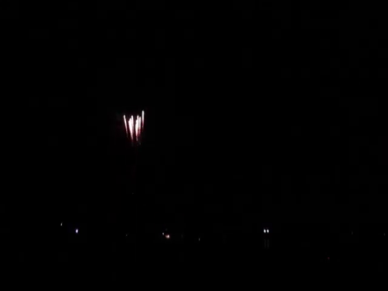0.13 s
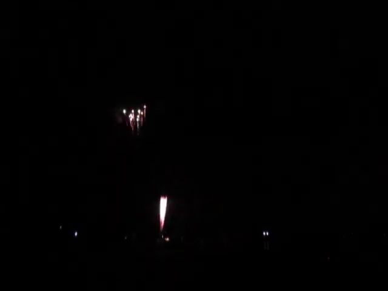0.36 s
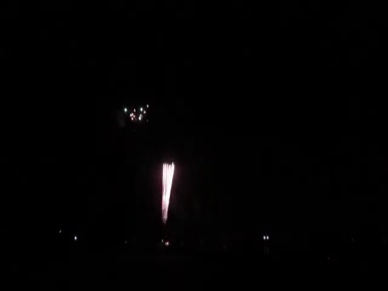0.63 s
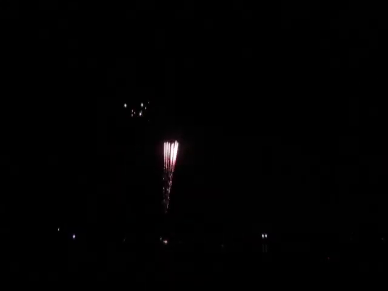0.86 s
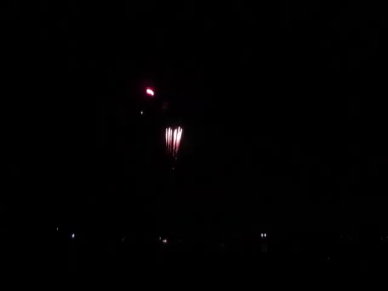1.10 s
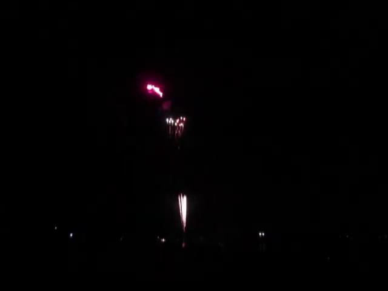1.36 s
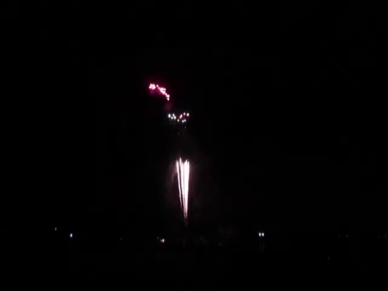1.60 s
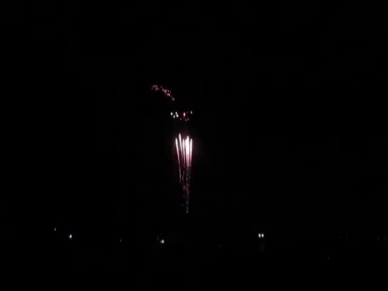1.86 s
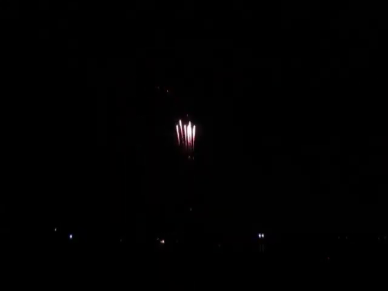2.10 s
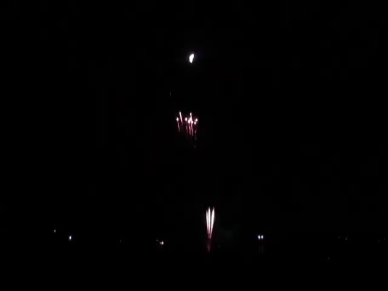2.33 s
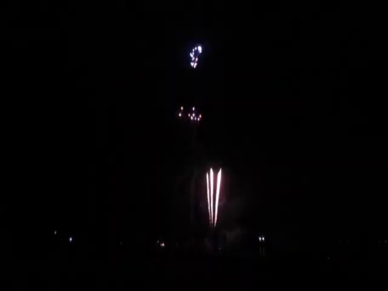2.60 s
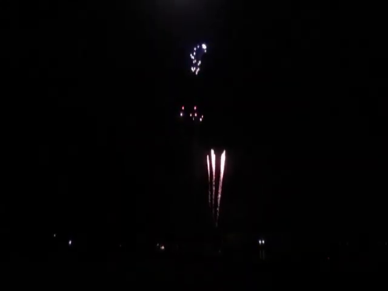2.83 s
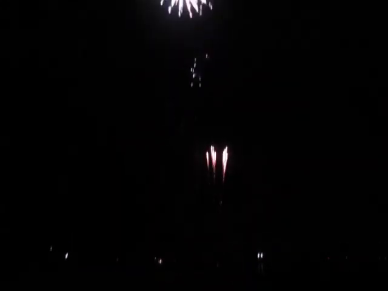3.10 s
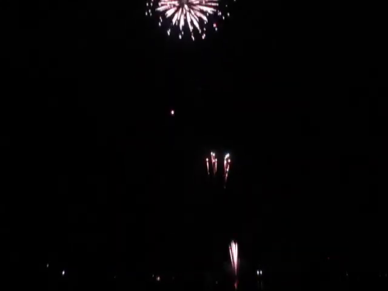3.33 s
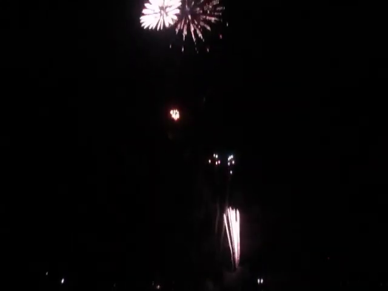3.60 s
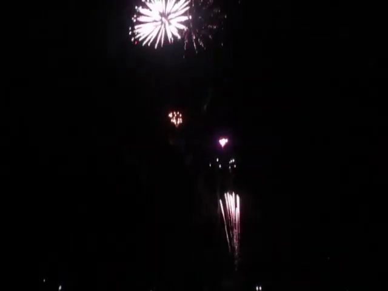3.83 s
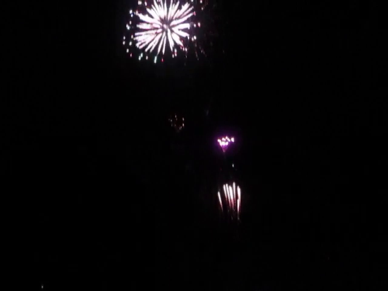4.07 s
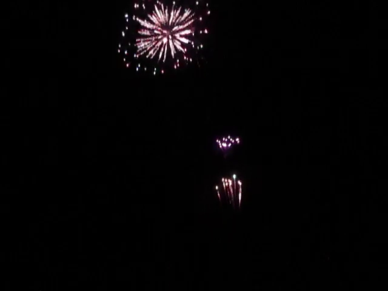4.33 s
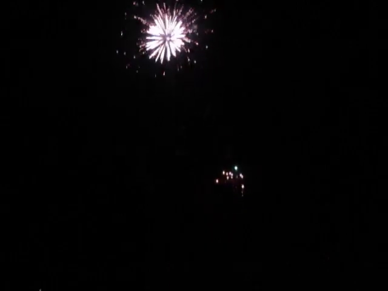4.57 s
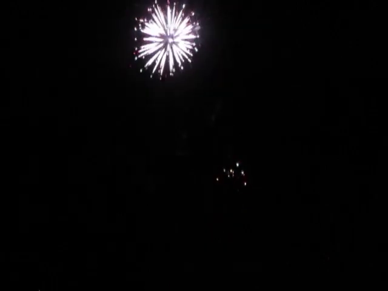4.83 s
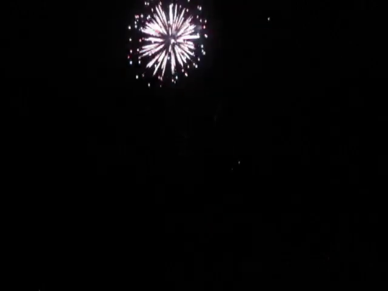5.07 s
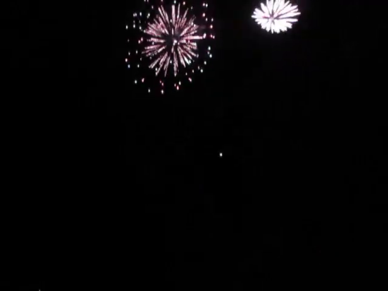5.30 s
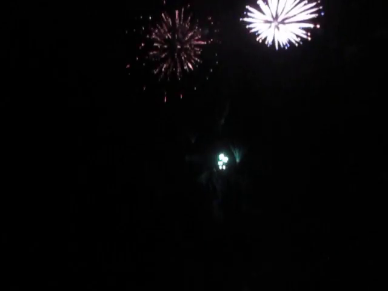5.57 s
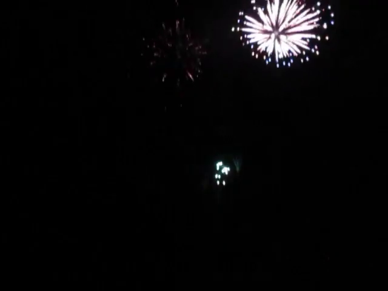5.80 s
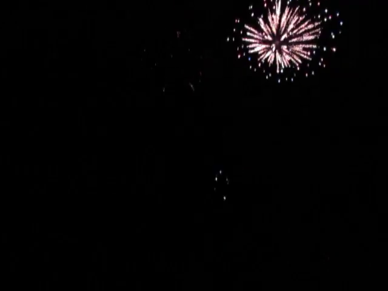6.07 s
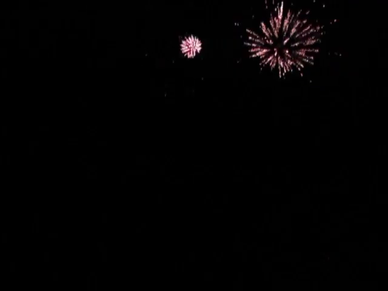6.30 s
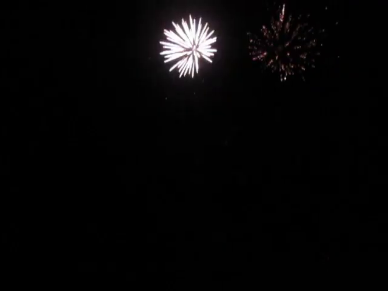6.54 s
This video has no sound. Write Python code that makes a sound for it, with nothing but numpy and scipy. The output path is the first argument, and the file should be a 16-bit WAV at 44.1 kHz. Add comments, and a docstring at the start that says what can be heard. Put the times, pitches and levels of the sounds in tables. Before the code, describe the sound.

Gusty wind thumps a microphone while firework mortars thud, small shells crack, and large aerial shells bang hard with short slapping echoes.

```python
"""Fireworks at night across open ground: gusty wind, a distant roar and a faint bush cricket run from the start.
Four mortar volleys follow about a second apart, each cracks over a decaying sine boom; meanwhile small shells
crack low, and later large shells burst high. Each burst is a filtered shock wave with delayed echoes from the
ground and walls, then a roll of decaying noise. Wind eddies thump; the loudest peaks overload the microphone."""
import sys
import numpy as np
from scipy import signal
from scipy.fft import rfft, irfft
from scipy.io import wavfile
from scipy.ndimage import uniform_filter1d

SR = 44100
rng = np.random.default_rng(int(sys.argv[2]) if len(sys.argv) > 2 else 0)


def volts_from_db(level):
    """Convert decibel levels to linear amplitude ratios."""
    exponent = np.asarray(level, float) / 20
    return 10 ** exponent


def wrap_up_sound(samples):
    """Save the sound to the file named by the first command line argument, as 16-bit audio."""
    columns = np.atleast_2d(samples).T
    # keep every value between -1 and 1, then stretch to whole-number steps
    tamed = np.clip(columns, -1, 1)
    steps = np.round(tamed * 32767).astype(np.int16)
    wavfile.write(sys.argv[1], SR, steps)


N = 294323

# Shell bursts. Each row: start in seconds, front level before the path filter in dB, push in ms,
# then the delays in ms of three echoes that move with the place of the burst.
LARGE_BURSTS = [(3.20278, 6, .70, 8.6, 67.4, 88.5), (4.05028, 6, .66, 8.55, 67.4, 93.4),
                (5.06122, 7, .82, 8.35, 68.0, 91.7), (5.74243, 5.5, .68, 8.85, 66.1, 90.5)]
SMALL_BURSTS = [(1.53495, -2, .33, 16.5, 22.0, 72.3), (2.79328, -22, .30, 16.6, 22.7, 72.0),
                (3.87625, -4.5, .30, 18.4, 22.7, 69.6), (4.21402, -3.5, .29, 16.1, 22.3, 73.1),
                (5.86502, -8.5, .30, 16.4, 22.3, 73.0)]
# Echoes at a fixed delay. Each row: delay in ms, level relative to the shot in dB, low-pass in Hz.
LARGE_FIXED_ECHOES = [(1.6, -15, 3000), (6.0, -7, 2500), (21.0, -18, 2800), (31.5, -23, 700),
                      (248, -30, 1200)]
SMALL_FIXED_ECHOES = [(4.75, -2, 2600), (5.5, -6, 2200), (6.3, -12, 2000), (7.1, -15, 1800),
                      (50.5, -19, 1800)]
# Moving echoes, each with a ground bounce. Each row: echo level relative to the shot in dB, low-pass in Hz,
# bounce delay after the echo in ms, bounce level relative to the shot in dB.
LARGE_MOVING_ECHOES = [(-8.5, 1600, 3.2, -28), (-24, 3600, 2.4, -19), (-24, 1500, 1.2, -26)]
SMALL_MOVING_ECHOES = [(-10, 2300, .8, -19), (-10, 2200, .8, -19), (-23, 4600, 3.5, -25)]
# Mortar volleys. Each row: start in seconds, main crack level in dB, push in ms, low-pass in Hz,
# reference level of the other tubes in dB, boom level in dB.
MORTAR_VOLLEYS = [(.65235, 4, .8, 2200, -10, -6.5), (1.66245, 3, .45, 4500, -8, -8),
                  (2.66662, 3, .75, 2800, -12, -11), (3.67260, -1, .9, 1200, -15, -8)]
# Roll after a shot, a quick spray over a long tail. The row: spray level in dB, spray T60 in seconds,
# tail level in dB, tail T60 in seconds; levels before the roll's common gain.
LARGE_ROLL_DECAY = (-13.5, 0.1163, -40.5, 7)
SMALL_ROLL_DECAY = (-16, 0.0151, -34, 3)
VOLLEY_ROLL_DECAY = (-21.5, 0.3, -36.5, 1.6)
# Roll spectrum. Each row: frequency in Hz, gain in dB.
ROLL_SPECTRUM = [(60, 10.5), (300, -4.5), (1000, -4.5), (3000, -9), (6000, -5), (10000, -20), (16000, -19)]
# Faint puffs, probably echoes of earlier or farther shots. Each row: start in seconds,
# level before the decay in dB, treble tilt in dB per octave.
FAINT_PUFFS = [(0.139, -37, 5), (0.174, -36.5, 7), (0.257, -39.5, 6), (0.2948, -28.5, -2.5),
               (0.366, -35.5, 0), (0.4554, -37.5, 4.5), (0.4863, -33, 4), (0.577, -29.5, 3),
               (0.732, -27, 5), (1.3144, -20, -4.5), (1.719, -26.5, -7), (1.7635, -28, -5.5),
               (2.2614, -41, 4), (2.3877, -30.5, -5.5), (2.4559, -29, -3), (2.559, -35, 3.5),
               (6.282, -50.5, 9.5)]
# Smeared echoes from far slopes and buildings, after every shot of a kind. Each row: delay in seconds,
# level relative to the shot in dB, treble tilt in dB per octave.
LARGE_LATE_ECHOES = [(0.129, -61.5, 6.5), (0.392, -44.5, 8), (.572, -61.5, 11.5)]
VOLLEY_LATE_ECHOES = [(.370, -48, 8.8)]
# Puff spectrum before the tilt. Each row: frequency in Hz, relative level in dB per Hz.
PUFF_SPECTRUM = [(410, -6.5), (800, -9.5), (1480, 6), (2010, -7), (2610, -7), (3750, -17), (14000, -71.5)]
# Leaves return the treble of a large burst. Each row: delay in seconds, level relative to the burst in dB,
# T60 in seconds.
LEAF_RETURNS = [(0, -63, 0.28), (.128, -76, .5)]
# Leaf spectrum. Each row: frequency in Hz, relative level in dB per Hz.
LEAF_SPECTRUM = [(4000, -30), (6500, -2), (8500, 0), (12000, -9), (16000, -22)]
# Gust envelope. Each row: time in seconds, gust level in dB (counted from CALM_DB).
GUST_LEVELS = [(0.0, -40), (0.3, -36), (0.5, -38.5), (0.631, -29), (0.78, -44), (0.87, -27), (0.981, -48),
               (1.171, -22), (1.22, -26), (1.291, -22), (1.4, -41), (1.49, -34), (1.6, -35), (2.15, -46.5),
               (2.56, -34.5), (2.85, -39), (3.5, -42), (3.85, -33), (4.35, -49.5), (4.65, -33.5),
               (4.9, -31.5), (5.15, -28.5), (5.36, -35), (5.45, -25.5), (5.5, -29.5), (5.701, -23),
               (5.84, -39.5), (6.12, -36), (6.3, -51.5), (6.4, -34), (6.48, -47.5), (6.561, -31.5),
               (6.67, -49)]
# Strongest eddies. Each row: centre in seconds, level in dB, frequency in Hz.
WIND_THUMPS = [(0.57, -17, 195), (0.633, -12, 302), (0.642, -9, 485), (0.706, -17, 160), (0.825, -12, 195),
               (0.88, -9, 560), (0.901, -14, 163), (1.145, -15, 345), (1.174, -10, 191), (1.182, -14, 321),
               (1.228, -14, 478), (1.267, -12, 342), (1.278, -12, 298), (1.291, -9, 319), (1.303, -13, 221),
               (1.494, -20, 202), (2.545, -18, 193), (2.554, -17, 253), (2.63, -14, 188), (2.726, -18, 185),
               (3.012, -21, 271), (3.596, -22, 244), (3.832, -21, 195), (4.445, -19, 261),
               (4.949, -13, 395), (4.979, -20, 330), (5.146, -14, 260), (5.172, -19, 352),
               (5.268, -15, 299), (5.311, -19, 564), (5.41, -16, 329), (5.432, -10, 386), (5.458, -15, 197),
               (5.547, -13, 308), (5.618, -18, 199), (5.66, -16, 308), (5.678, -15, 317), (5.724, -14, 435),
               (6.09, -23, 316), (6.128, -22, 228), (6.383, -24, 166), (6.517, -23, 185), (6.545, -20, 200),
               (6.558, -20, 261)]
# Wind rumble spectrum. Each row: frequency in Hz, relative level in dB per Hz.
RUMBLE_SPECTRUM = [(15, 14), (30, -14.5), (60, 10), (110, 4), (200, -36.5), (400, -120.5)]
# Distant roar envelope. Each row: time in seconds, level in dB.
ROAR_LEVELS = [(0.0, -45), (0.61, -39.5), (1.11, -47), (1.6, -40.5), (2.17, -49), (2.62, -43.5), (3.3, -51),
               (3.88, -41.5), (4.59, -45.5), (5.7, -48), (6.1, -52), (6.67, -51.5)]
# Roar spectrum. Each row: frequency in Hz, relative level in dB per Hz.
ROAR_SPECTRUM = [(88, -53), (150, -2), (260, -1), (687, -21), (841, -10.5), (991, -8.5), (1110, -9),
                 (1350, -12), (2670, -21.5), (12000, -62.5), (15600, -100), (22000, -120)]
# Bush cricket trills. Each row: start in seconds, end in seconds, level in dB.
CRICKET_TRILLS = [(-.124, .145, -89), (.805, 1.0, -88), (2.065, 2.455, -87), (2.89, 3.24, -87),
                  (3.762, 4.08, -88)]
# Cricket wing spectrum. Each row: frequency in Hz, relative level in dB per Hz.
WING_SPECTRUM = [(9500, -30), (11200, -5), (12400, -5), (13300, -6), (14000, 0), (15400, -8), (16000, -40)]

BLAST_HIGHPASS_HZ = 62.4  # blasts carry no steady pressure
AIR_LOSS_DB_PER_S_KHZ = 1
GRIT_DB = -21
BOOM_HZ = 62
PUFF_RISE_S, PUFF_T60_S = 0.0041, 0.05
CALM_DB = -40.5  # gust level at which rumble and flutter have their base level
LUMPS_RMS_DB, LUMP_S = 2, .03
RUMBLE_DB, RUMBLE_DB_PER_GUST_DB = -38.5, 0.91
EDDIES_PER_S = 260
FLUTTER_DB, FLUTTER_DB_PER_GUST_DB = -45, 0.94  # per band, at 130 Hz
TILT_DB_PER_OCTAVE, TILT_PER_GUST_DB = -6.5, 0.13  # strong gusts shed smaller eddies
STROKES_PER_S = 25.2
HISS_DB = -93


def evened(x):
    """Scales to rms 1."""
    return x / np.sqrt(np.mean(x ** 2) + 1e-20)


def read(points, hz):
    """Interpolates a spectrum on a log-frequency axis."""
    f, value = np.transpose(points)
    return np.interp(np.log(hz + 1), np.log(f + 1), value)


def add(mix, s, sound):
    """Mixes a sound in at time s."""
    part = mix[max(round(s * SR), 0):][:len(sound)]
    part += sound[:len(part)]


def coloured(x, points):
    """Filters by a spectrum, then scales to rms 1."""
    gain = volts_from_db(read(points, np.fft.rfftfreq(len(x), 1 / SR)))
    return evened(irfft(rfft(x) * gain, len(x)))


def bursts(rows, fixed, moving, decay, suck, top_hz):
    """Shell bursts: direct shock, delayed low-passed echoes with grit, then the roll."""
    out = np.zeros(N)
    for s, db, push_ms, *moving_ms in rows:
        paths = [(0, 0, top_hz), *fixed]
        for ms, (echo_db, hz, bounce_ms, bounce_db) in zip(moving_ms, moving):
            paths += [(ms, echo_db, hz), (ms + bounce_ms, bounce_db, hz)]
        for ms, echo_db, hz in paths:
            gain = volts_from_db(db + echo_db)
            add(out, s + ms / 1000, gain * shock(push_ms, suck, hz))
            if ms > 0:
                add(out, s + ms / 1000, gain * (hz / 2500) ** 2 * grit(push_ms))
        add(out, s, volts_from_db(db) * roll(shock(push_ms, suck, top_hz), decay))
    return out


def shock(push_ms, suck, top_hz):
    """A steep front, a falling push, a suction of depth suck, then rest; the path rounds it off."""
    u = np.arange(400) / SR * 1000 / push_ms
    wave = np.interp(u, [0, 1, 1.5, 2.1, 3.5], [1, 0, -.75 * suck, -suck, 0])
    return signal.lfilter(*signal.bessel(3, min(top_hz, 18000), fs=SR, norm="mag"), wave)


def grit(push_ms, spray_ms=0.82):
    """Rough surfaces scatter the bright part of a front into a short noise spray."""
    t_ms = np.arange(300) / SR * 1000
    spray = rng.standard_normal(len(t_ms)) * np.exp(-t_ms / spray_ms)
    front = signal.lfilter(*signal.butter(2, 2500, "high", fs=SR), shock(push_ms, 0.4, 4160))
    return volts_from_db(GRIT_DB) * np.convolve(front, spray)


def roll(wave, decay):
    """Thousands of small scattered copies of a shot, losing treble as they travel."""
    size = round(1.2 * SR)
    patch_db = 2.44 * rng.exponential(1, size // 20 + 1).repeat(20)[:size]
    taps = evened(rng.standard_normal(size) * volts_from_db(patch_db))
    taps = taps * two_decays(np.arange(size) / SR, *decay)
    hz, t, z = signal.stft(taps, SR, nperseg=256)
    air_db = AIR_LOSS_DB_PER_S_KHZ * t * hz[:, None] / 1000
    z = z * volts_from_db(read(ROLL_SPECTRUM, hz)[:, None] - air_db)
    return 0.19 * signal.fftconvolve(signal.istft(z, SR, nperseg=256)[1], wave)


def two_decays(t, spray_db, spray_t60_s, tail_db, tail_t60_s):
    """Gain of a quick decay that gives way to a slow one."""
    return np.hypot(volts_from_db(spray_db - 60 * t / spray_t60_s), volts_from_db(tail_db - 60 * t / tail_t60_s))


def volleys():
    """Several tubes fire within 16 ms; their gas leaves together as one slow boom."""
    out, t = np.zeros(N), np.arange(round(.08 * SR)) / SR
    swell = (t / .0135 * np.exp(1 - t / .0135)) ** 2
    boom = swell * np.sin(2 * np.pi * BOOM_HZ * t + .45)
    for s, db, push_ms, top_hz, tubes_db, boom_db in MORTAR_VOLLEYS:
        add(out, s, volts_from_db(db) * shock(push_ms, .25, top_hz))
        add(out, s, volts_from_db(db - 7) * (top_hz / 2500) * grit(push_ms))
        add(out, s + .0029, volts_from_db(db - 11) * shock(push_ms, .3, 2200))  # ground bounce
        for at, fade, push in rng.random((30, 3)):
            tube_s = s - .007 + .016 * at
            crack = shock(.1 + .4 * push, .9, 2400)
            add(out, tube_s, volts_from_db(tubes_db - 9 * fade - 4 * at) * crack)
            add(out, tube_s, volts_from_db(tubes_db - 6.3 * fade + 5) * grit(push_ms))
        add(out, s - .008, volts_from_db(boom_db) * boom)
        add(out, s, volts_from_db(db) * roll(shock(push_ms, 0.58, 5400), VOLLEY_ROLL_DECAY))
    return out


def late_echoes():
    """Short noise puffs with a soft start, each with its own treble tilt."""
    out, t = np.zeros(N), np.arange(4096) / SR
    shape = np.minimum(t / PUFF_RISE_S, 1) * volts_from_db(-60 * t / PUFF_T60_S)
    puffs = list(FAINT_PUFFS)
    for shots, echoes in ((LARGE_BURSTS, LARGE_LATE_ECHOES), (MORTAR_VOLLEYS, VOLLEY_LATE_ECHOES)):
        for s, db, *_ in shots:
            puffs += [(s + after_s, db + echo_db, tilt_db) for after_s, echo_db, tilt_db in echoes]
    for s, db, tilt_db in puffs:
        colour = [(hz, level_db + tilt_db * np.log2(hz / 2000)) for hz, level_db in PUFF_SPECTRUM]
        add(out, s, volts_from_db(db) * shape * coloured(rng.standard_normal(len(t)), colour))
    return out


def rustle():
    """Leaves return each large burst as decaying, grainy high noise."""
    out, t = np.zeros(N), np.arange(round(.4 * SR)) / SR
    for s, db, *_ in LARGE_BURSTS:
        for after_s, level_db, t60_s in LEAF_RETURNS:
            grain_db = 1.5 * rng.exponential(1, len(t) // 60 + 1).repeat(60)[:len(t)]
            grains = rng.standard_normal(len(t)) * volts_from_db(grain_db)
            add(out, s + after_s, volts_from_db(db + level_db - 60 * t / t60_s) * coloured(grains, LEAF_SPECTRUM))
    return out


def wind():
    """Rumble and flutter follow lumpy gusts; single thumps stand out."""
    gust_db = np.interp(np.arange(N) / SR, *np.transpose(GUST_LEVELS)) - CALM_DB
    width = round(LUMP_S * SR)
    lumps = uniform_filter1d(uniform_filter1d(rng.standard_normal(N), width), width)
    gust_db = gust_db + LUMPS_RMS_DB * evened(lumps)
    return thumps() + flutter(gust_db) + rumble(gust_db)


def thumps():
    """The strongest eddies, each one sharp pressure wobble on the microphone."""
    out = np.zeros(N)
    for (s, db, hz), phase in zip(WIND_THUMPS, rng.random(len(WIND_THUMPS))):
        add(out, s - 512 / SR, volts_from_db(db) * eddy(hz, phase, turns=.8, sharp=.45))
    return out


def flutter(gust_db):
    """Random trains of small eddies in eight sizes, brighter in strong gusts."""
    out = np.zeros(N)
    for hz in np.geomspace(130, 800, num=8):
        strength_db = 3 * np.minimum(rng.exponential(1, N), 3)
        train = (rng.random(N) < EDDIES_PER_S / 8 / SR) * volts_from_db(strength_db)
        band = evened(signal.oaconvolve(train, eddy(hz, rng.random()), "same"))
        tilt_db = (TILT_DB_PER_OCTAVE + TILT_PER_GUST_DB * gust_db) * np.log2(hz / 130)
        out += volts_from_db(FLUTTER_DB + FLUTTER_DB_PER_GUST_DB * gust_db + tilt_db) * band
    return out


def eddy(hz, phase, turns=0.52, sharp=0.067):
    """One pressure wobble of a cycle or two with a quicker kink on top, centred 512 samples in."""
    u = (np.arange(1024) - 512) / SR * hz
    kink = sharp * np.exp(-(2.1 * u / turns) ** 2) * np.cos(2 * np.pi * (1.61 * u + 3 * phase))
    return np.exp(-(u / turns) ** 2) * np.cos(2 * np.pi * (u + phase)) + kink


def rumble(gust_db):
    """Low turbulence noise whose level follows the gusts."""
    level_db = RUMBLE_DB + RUMBLE_DB_PER_GUST_DB * gust_db
    return volts_from_db(level_db) * coloured(rng.standard_normal(N), RUMBLE_SPECTRUM)


def roar():
    """Far scattered sound of earlier bursts: noise, patchy in frequency and flickering in time."""
    frames, hz = N // 128 + 5, np.fft.rfftfreq(512, 1 / SR)
    a, b, patches = rng.standard_normal((3, frames, 257))
    patches = evened(uniform_filter1d(uniform_filter1d(patches, 8, 1), 12, 0))
    flicker = evened(uniform_filter1d(rng.standard_normal(frames), 4))[:, None]
    z = (a + 1j * b) * volts_from_db(read(ROAR_SPECTRUM, hz) + 2 * patches + 2 * flicker)
    noise = evened(signal.istft(z.T, nperseg=512, noverlap=384)[1][:N])
    return volts_from_db(np.interp(np.arange(N) / SR, *np.transpose(ROAR_LEVELS))) * noise


def cricket():
    """Faint high noise rasps, one per wing stroke, swelling at the start of each trill."""
    t, gate = np.arange(N) / SR, np.zeros(N)
    for s, end_s, db in CRICKET_TRILLS:
        phase = (t - s) * STROKES_PER_S % 1
        stroke = np.clip(1.5 * np.sin(np.pi * np.minimum(phase / .62, 1)), 0, 1)
        swell = np.clip((t - s) / 0.21 + 0.17, 0, 1)
        gate += volts_from_db(db) * stroke * swell * (t > s) * (t < end_s)
    return gate * coloured(rng.standard_normal(N), WING_SPECTRUM)


def hiss():
    """Microphone self-noise: steady, flat up to 15.6 kHz."""
    return volts_from_db(HISS_DB) * coloured(rng.standard_normal(N), [(20, 0), (15600, 0), (16000, -30)])


def scene():
    """Everything the microphone meets."""
    large = bursts(LARGE_BURSTS, LARGE_FIXED_ECHOES, LARGE_MOVING_ECHOES, LARGE_ROLL_DECAY,
                   suck=.45, top_hz=3800)
    small = bursts(SMALL_BURSTS, SMALL_FIXED_ECHOES, SMALL_MOVING_ECHOES, SMALL_ROLL_DECAY,
                   suck=.7, top_hz=4500)
    shots = signal.lfilter(*signal.butter(2, BLAST_HIGHPASS_HZ, "high", fs=SR), large + small)
    return (shots + volleys() + late_echoes() + rustle() + wind() + roar() + cricket())[None]


def low_pass(x):
    """Removes everything above the highest recorded frequency."""
    return signal.sosfilt(signal.butter(12, 16470, fs=SR, output="sos"), x)


def record(dry):
    """Self-noise joins; the input clips hard at full scale."""
    mix = np.clip(dry + hiss(), -1, 1)
    return low_pass(mix)


dry = scene()
out = record(dry)
wrap_up_sound(out)
```